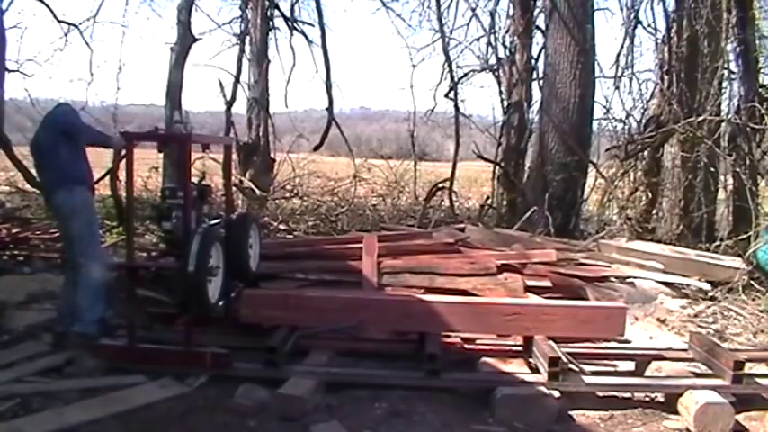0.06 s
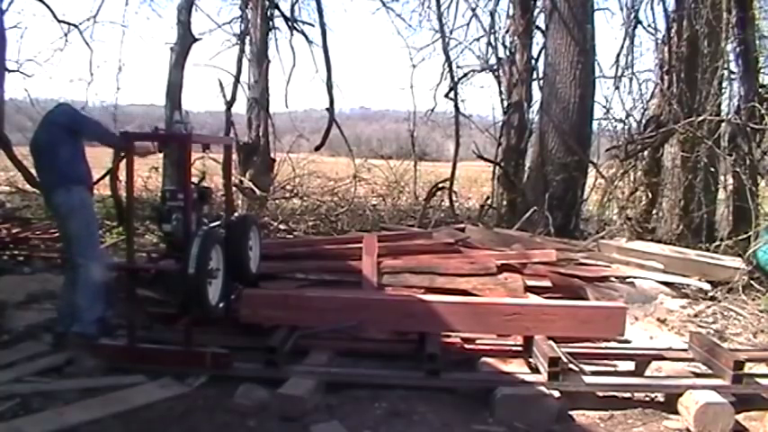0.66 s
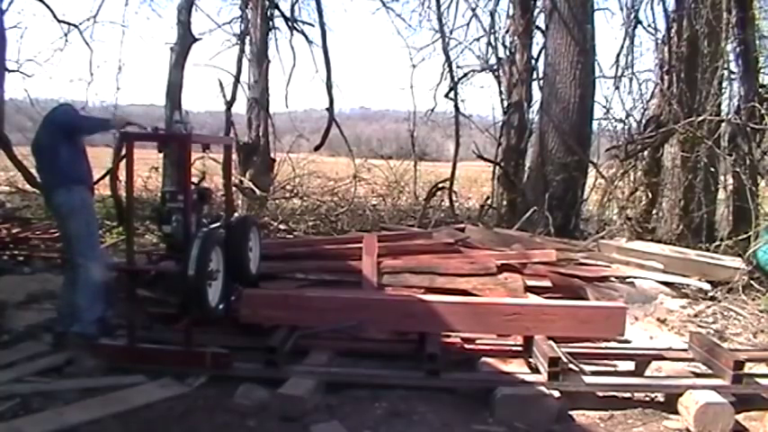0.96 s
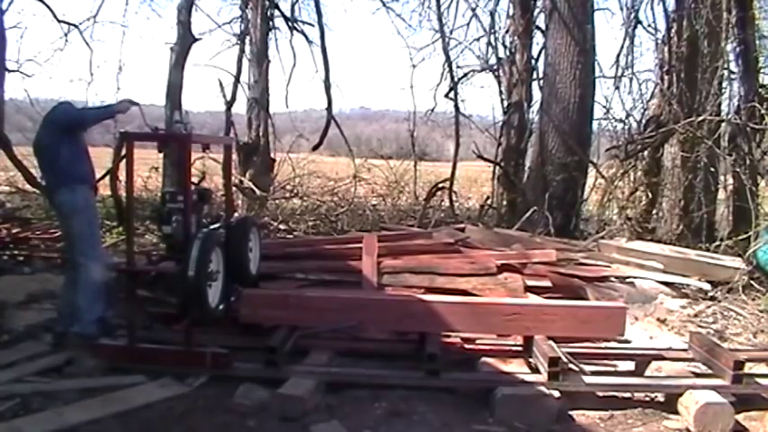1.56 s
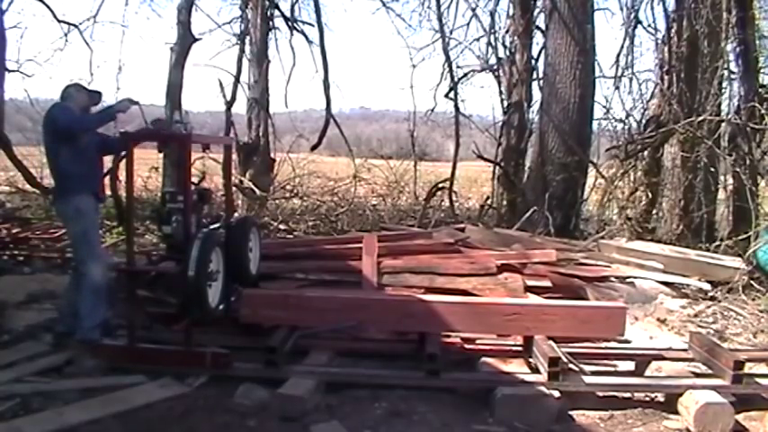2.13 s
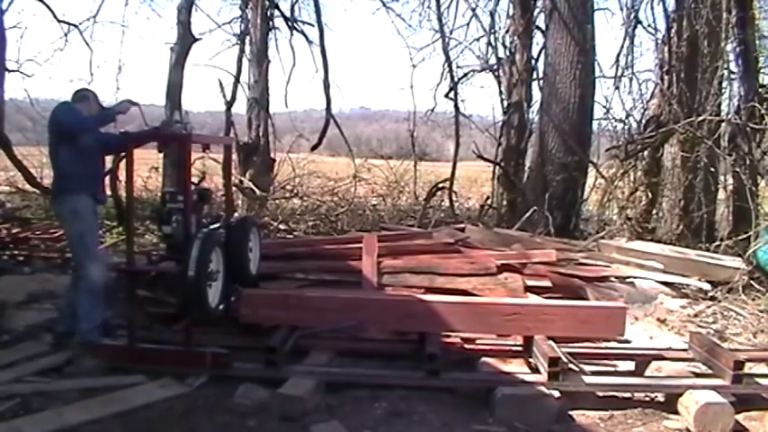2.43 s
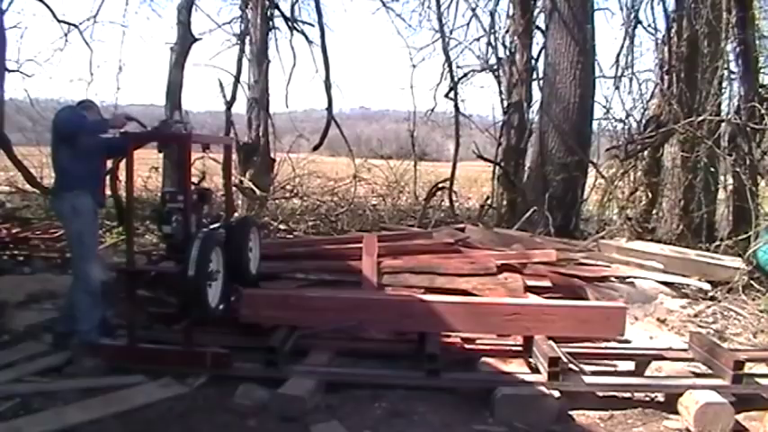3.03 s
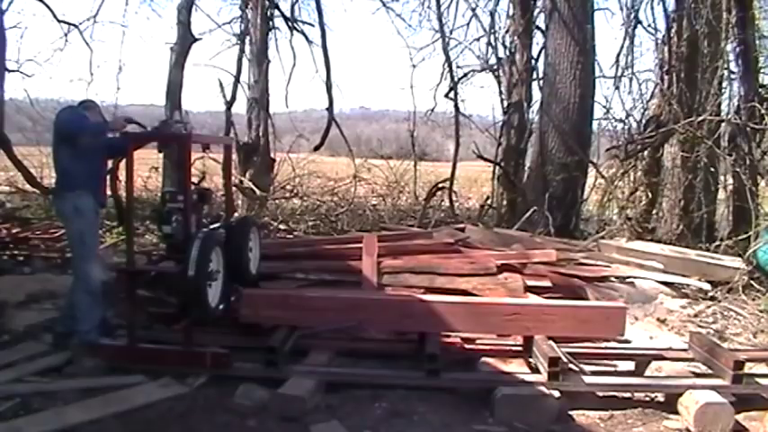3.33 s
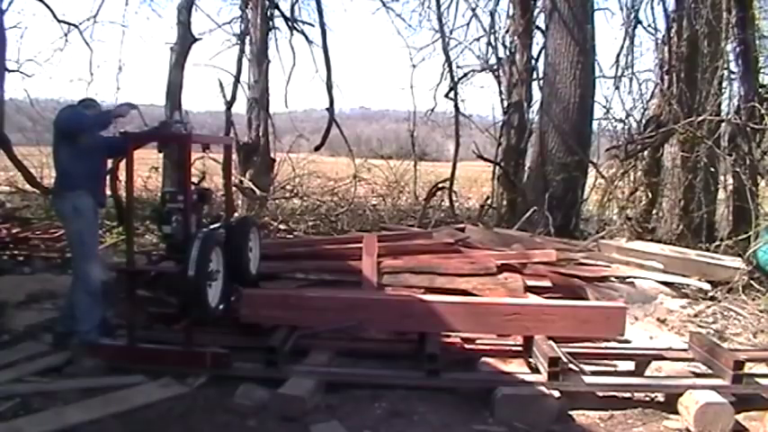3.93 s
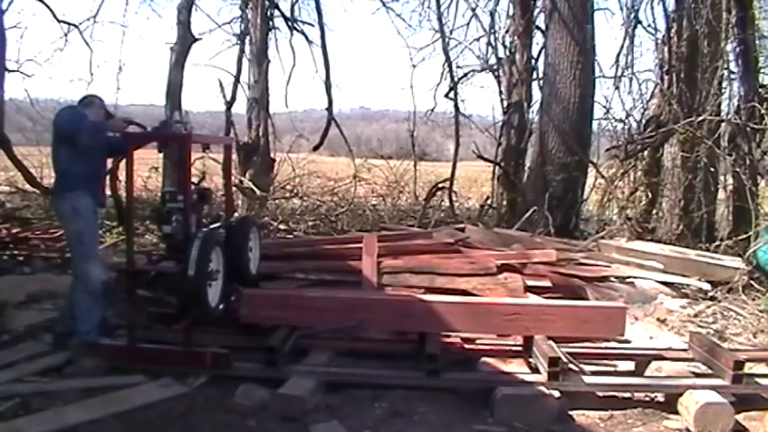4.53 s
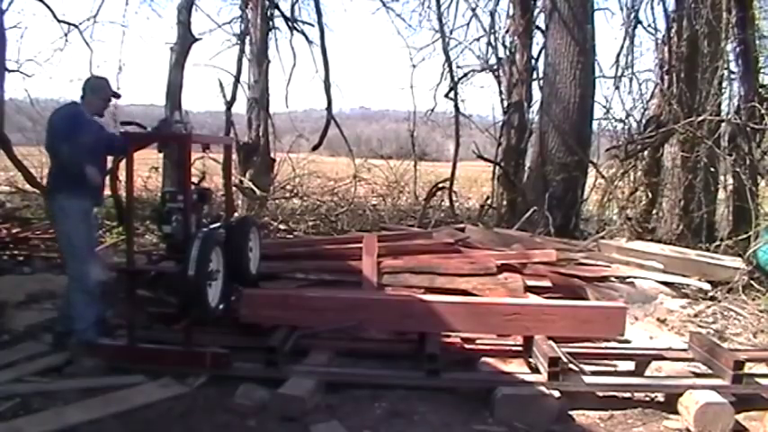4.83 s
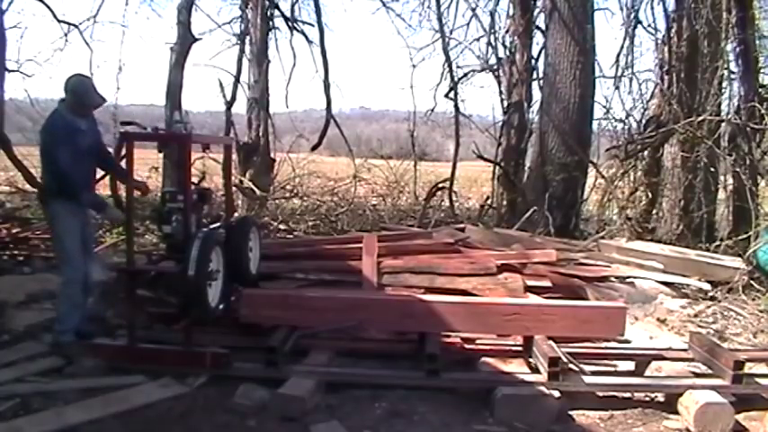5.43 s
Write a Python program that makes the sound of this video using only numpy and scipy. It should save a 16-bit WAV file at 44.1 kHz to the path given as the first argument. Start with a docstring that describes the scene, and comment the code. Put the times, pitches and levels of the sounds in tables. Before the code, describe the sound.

A sawmill crank ratchets quickly as its carriage rumbles to a stop, then steel levers clank and ring outdoors.

```python
"""A pawl clacks over the ratchet of a small sawmill's height crank, faster, then slower.
The carriage rumbles on its track and stops; steel levers squeak and clank against the ringing frame.
Under it: open air, a far traffic drone, a faint camera whine.
The camera's gain control ducks at loud clacks; the background swells back after each."""
import sys
import numpy as np
from scipy import signal
from scipy.fft import rfft, irfft, next_fast_len
from scipy.io import wavfile
from scipy.ndimage import uniform_filter1d, minimum_filter1d, map_coordinates

SR = 44100
rng = np.random.default_rng(int(sys.argv[2]) if len(sys.argv) > 2 else 0)


def unload_audio(sound):
    """Save the sound as a 16-bit wav file, at the path given as the first command line argument."""
    columns = np.transpose(np.atleast_2d(sound))
    # keep every value between -1 and 1, then stretch to whole-number steps
    steps = np.round(np.clip(columns, -1, 1) * 32767)
    wavfile.write(sys.argv[1], SR, steps.astype(np.int16))


N = 250488
T = np.arange(int(.7 * SR)) / SR  # time axis of one hit, s
TOP_HZ = 15500

# pawl drops, one per tooth [t/s, knock re mid band/dB]
PAWL_DROPS = [(0.0561, -13), (0.1489, -20), (0.2645, -16.5), (0.3962, -11), (0.5042, -10), (0.5897, -14),
              (0.6578, -14), (0.713, -12.5), (0.7686, -12), (0.829, -14.5), (0.8968, -12.5), (0.973, -17),
              (1.057, -16.5), (1.176, -14.5)]
# levers and catches on the frame [t/s, relative level/dB, treble/dB, treble knee f/Hz]
LEVER_HITS = [(2.333, -43, -20, 4190), (2.62, -10, -3, 4500), (2.673, -12.5, -1.5, 4480),
              (3.799, -41, -21, 4500), (3.8108, -26, -14.5, 4300), (4.306, -23.5, -13, 3740),
              (4.3103, -9.5, -8.5, 3780), (4.531, -40.5, -7, 4860), (4.538, -28, -25, 4830),
              (4.7081, -41, -24, 3750), (5.2986, -30.5, -20, 2880)]
# bars left free to ring by their catch [t/s, f/Hz, level/dB, t60/s]
BAR_RINGS = [(2.621, 1130, -34, 0.69), (2.673, 3150, -37, 0.59), (4.311, 3150, -30.5, 0.59),
             (4.539, 3150, -48, 0.71), (5.156, 2280, -41.5, 0.17), (5.156, 2500, -50, 0.2)]
# loose fittings [t/s, relative level/dB, treble/dB]
FITTING_TICKS = [(2.5367, -50.5, -10), (3.326, -54.5, -34), (3.8827, -53.5, 5), (4.684, -47, -21),
                 (5.114, -53, -8), (5.163, -50.5, -7), (5.4323, -53.5, -7.5)]
# dry pivots [centre t/s, length/s, f/Hz, level/dB, waver/share of f]
PIVOT_SQUEAKS = [(0.674, 0.045, 372, -41, 0.12), (.91, 0.098, 526, -44, 0.035),
                 (3.695, 0.064, 1907, -47.5, 0.0084)]
# squeak overtones [ratio to pitch, relative level/dB]
PIVOT_OVERTONES = [(1.67, 4), (2.25, 1.5), (3.1, 3.5), (5.32, -2.5), (6.55, 1.5)]
# dull bumps; at 2.62 s, a low thud under the loud clank [t/s, relative level/dB, hollow f/Hz]
DULL_BUMPS = [(1.637, -38.5, 399), (1.682, -37.5, 940), (1.754, -35, 440), (1.796, -43, 467),
              (2.621, -26.5, 140), (5.297, -31, 775), (5.438, -44.5, 720)]
# steel frame modes [f/Hz, relative level/dB, t60/s]
FRAME_MODES = [(1040, -23.5, 0.25), (1162, -10, 0.27), (1334, -5.5, 0.15), (1520, -12, 0.27),
               (2280, -7, 0.14), (2382, -15.5, 0.139), (3046, -9.5, 0.29), (3127, -9, 0.31),
               (3210, -10.5, 0.14), (3626, -16.5, 0.18), (3930, -14.5, 0.1), (4070, -14, 0.18),
               (4300, -10, 0.12), (4620, -11, 0.27), (5117, -16, 0.21), (6520, -6, 0.28), (6530, -11, 0.32),
               (7980, 0.5, 0.16), (8800, -5, .16), (8620, -4, 0.22), (9350, -12.5, 0.16), (9600, -4, 0.13),
               (11100, -8, 0.088), (13000, -2.5, .12)]

# envelopes [t/s, level/dB]
ROLL_LEVEL = [(0, -42.5), (.6, -38.5), (1.2, -44.5), (1.7, -48), (2, -52), (3, -62.5)]  # rolling carriage
TRAFFIC_LEVEL = [(0, -59), (1.6, -55.5), (3, -57.5), (5.68, -61.5)]  # far traffic, passing and receding
RUMBLE_LEVEL = [(0, -74.5), (2.5, -76.5), (5.3, -83), (5.6, -60)]  # its lowest band

# spectra [f/Hz, relative level/dB]
PAWL_SPECTRUM = [(150, -19.5), (500, -19), (1300, -1.5), (2300, -7.5), (2750, -11), (3300, -6.5),
                 (5200, -6.5), (5850, -7.5), (6450, 4), (7250, -2), (8600, 6), (10800, 0.5), (13600, -1.5),
                 (15200, -8)]  # dense ring of the pawl
LEVER_SPECTRUM = [(150, -17.5), (500, -18.5), (1100, -10.5), (2100, -1), (2600, -6.5), (3200, 1.5),
                  (4400, -3.5), (5100, 0.5), (5800, -1.5), (6500, 4.5), (7300, -4), (9500, 0.5),
                  (12000, -4), (15200, -13)]  # dense ring of levers and fittings
TRACK_SPECTRUM = [(100, -22), (250, -9), (450, -0.5), (850, 3.5), (950, 5.5), (1005, 11), (1070, -2),
                  (1160, 3.5), (1450, 0), (2000, -12), (4000, -28.5), (9000, -38.5)]  # track under the wheels
BUMP_SPECTRUM = [(60, -19.5), (200, -5), (330, -4.5), (600, 0.5), (850, 2), (1100, -10.5), (2000, -19),
                 (5000, -58)]  # dull bumps
AIR_SPECTRUM = [(120, -30.5), (200, -7), (321, -8.5), (345, -7), (497, -7.5), (783, -1.5), (858, -5.5),
                (1130, -9.5), (1450, -12), (1680, -15), (2700, -26), (3120, -27.5), (7090, -37),
                (11400, -37.5), (15500, -46)]  # open air
TRAFFIC_SPECTRUM = [(30, -24.5), (60, -14), (75, -3.5), (105, -2), (130, 0.5), (160, 2.5), (210, -10),
                    (350, -19), (1000, -55)]  # far traffic
RUMBLE_SPECTRUM = [(30, -30.5), (55, -4.5), (76, 6.5), (100, -7.5), (160, -38.5)]  # its lowest band
BREEZE_SPECTRUM = [(20, 5), (60, -2), (200, -4), (400, -9), (1500, -63)]  # wind on the microphone ports
THUD_SPECTRUM = [(8, -31.5), (35, -6), (120, 2.5), (300, 3.5), (700, -2.5), (2000, -25.5), (5000, -60)]  # microphone overload

# decay times [f/Hz, t60/s]
STEEL_T60 = [(200, 0.056), (1000, 0.26), (3000, 0.2), (8000, 0.12), (14000, 0.099)]  # dense ring
TREE_T60 = [(200, 0.36), (1500, 0.55), (4000, 0.37), (8000, 0.24), (14000, 0.23)]  # scatter from trunks and timber

# left-right correlation [f/Hz, coefficient]
STEEL_CORR = [(300, .8), (1400, 0.78), (3500, 1), (9000, 1), (11700, 0.89), (14500, 0.474)]
AIR_CORR = [(60, -.3), (130, 1), (290, 0.11), (640, 0.9), (1410, 0.72), (3100, 0.77), (6820, 0.312),
            (15000, 0.5)]
# microphone port imbalance [f/Hz, left minus right level/dB]
PORT_BALANCE = [(200, -1), (1400, -0.5), (4000, 0.5), (8500, 0.5), (11500, 1.5), (14500, 7.5)]


def ratchet(level_db=-13, slide_db=-21, shared=.55, usual_gap_s=0.086):
    """A sprung pawl slides off each tooth onto one spot: equal force, partly the same ring."""
    out = np.zeros((2, N))
    wheel = noise_pair(STEEL_CORR, len(T))
    teeth = np.array([(-0.02, PAWL_DROPS[0][1]), *PAWL_DROPS])  # crank already turning
    gaps_s = np.diff(teeth[:, 0], prepend=teeth[0, 0] - usual_gap_s)
    for (t_s, knock_db), gap_s in zip(teeth, gaps_s):
        treble_db = -2.5 + np.log2(gap_s / usual_gap_s)  # quick teeth are duller
        grain = np.sqrt(shared) * wheel + np.sqrt(1 - shared) * noise_pair(STEEL_CORR, len(T))
        clack = blow(grain, PAWL_SPECTRUM, ring_db=-13, crack_db=6, crack_t60_s=0.0056,
                     trees_db=-13, contact_db=3)
        add(out, t_s, amp(level_db) * hardness(clack, knock_db, treble_db, knee_hz=4350))
        add(out, t_s - len(T) / SR, amp(level_db + slide_db) * scrape(PAWL_SPECTRUM, t60_s=0.0069))
    return out


def blow(grain, spectrum, ring_db, crack_db, crack_t60_s, trees_db, contact_db):
    """Steel on steel: bright crack, short dense ring, scatter from trees, frame modes."""
    crack = amp(crack_db) * fade(crack_t60_s) * coloured(grain, [(2500, 1), (8000, -4)])
    diffuse = noise_pair([(300, 0.41), (1400, 0.99), (3500, 0.89), (9000, 1), (14500, .3)], len(T))
    scatter = amp(trees_db) * damped(diffuse, TREE_T60) * (1 - fade(.08))
    dense = coloured((crack + damped(grain, STEEL_T60) + scatter) * (1 - fade(0.0035)), spectrum)
    struck = unit_attack(coloured(dense, contact_point(contact_db)))
    return struck + amp(ring_db) * frame_ring() * (1 - fade(.003))


def contact_point(spread_db, points=120):
    """Each contact point favours other resonances: a random spectrum [f/Hz, level/dB]."""
    return np.transpose([np.linspace(0, TOP_HZ, points), spread_db * rng.standard_normal(points)])


def frame_ring(spread_db=0.5, beat_hz=45, beat_depth=0.99):
    """Frame modes waver like close, beating clusters; strengths vary per blow."""
    hz, db, t60_s = np.transpose(FRAME_MODES)
    gains = amp(db + spread_db * rng.standard_normal(len(hz)))
    drift = np.array([wobble(beat_hz, len(T)) for _ in hz])
    phase = rng.uniform(0, 2 * np.pi, (len(hz), 1)) + beat_depth * drift
    beats = 1 + beat_depth * np.roll(drift, 1, axis=0) / 2
    return gains @ (np.sin(2 * np.pi * hz[:, None] * T + phase) * beats * fade(t60_s[:, None]))


def hardness(hit, knock_db, treble_db, knee_hz):
    """Hard contacts are brighter: set knock and treble against the mid band."""
    hz = np.fft.rfftfreq(len(T), 1 / SR)
    power = np.mean(abs(rfft(hit)) ** 2, axis=0)
    bands_hz = [(500, 1800), (1800, 7000), (7000, 15000)]
    low_db, mid_db, high_db = [10 * np.log10(power[(hz > a) & (hz < b)].sum()) for a, b in bands_hz]
    shelves = [(1300, knock_db - low_db + mid_db), (2200, 0),
               (knee_hz, 0), (1.63 * knee_hz, treble_db - high_db + mid_db)]
    return coloured(hit, shelves) * np.sqrt(power.sum()) / amp(mid_db)


def scrape(spectrum, t60_s):
    """Steel slides over an edge: a brief swell that ends at the blow."""
    friction = coloured(noise_pair(STEEL_CORR, len(T)), spectrum)
    return unit_attack(friction * fade(t60_s))[:, ::-1]


def levers(level_db=-3, slide_db=-20):
    """Catches scrape home and strike the frame, each at another spot."""
    out = np.zeros((2, N))
    for t_s, db, treble_db, knee_hz in LEVER_HITS:
        knock_db = -12.5 - 0.29 * treble_db  # softer contact: less treble, more knock
        clank = blow(noise_pair(STEEL_CORR, len(T)), LEVER_SPECTRUM, ring_db=-13, crack_db=12.5,
                     crack_t60_s=0.0061, trees_db=-12, contact_db=3.5)
        slide = scrape(LEVER_SPECTRUM, t60_s=0.005)
        add(out, t_s, amp(db + level_db) * hardness(clank, knock_db, treble_db, knee_hz))
        add(out, t_s - len(T) / SR, amp(db + slide_db) * hardness(slide, knock_db, treble_db, knee_hz))
    return out


def free_bars(waver_rad=.3):
    """A bar freed by its catch sings on after the blow."""
    out = np.zeros((2, N))
    for t_s, hz, db, t60_s in BAR_RINGS:
        tone = np.sin(2 * np.pi * hz * T + waver_rad * wobble(28, len(T)))
        add(out, t_s, amp(db) * tone * fade(t60_s) * (1 - fade(0.017)))
    return out


def fittings(level_db=-6):
    """Loose parts tick, too lightly to ring the frame much."""
    out = np.zeros((2, N))
    for t_s, db, treble_db in FITTING_TICKS:
        tick = blow(noise_pair(STEEL_CORR, len(T)), LEVER_SPECTRUM, ring_db=-14.5, crack_db=-0.5,
                    crack_t60_s=.03, trees_db=-10.5, contact_db=1.5)
        add(out, t_s, amp(db + level_db) * hardness(tick, 3, treble_db, knee_hz=4120))
    return out


def pivots(overtones_db=-26, flicker_hz=300):
    """Dry pivots stick and slip: wavering pitch, flickering overtones."""
    out = np.zeros((2, N))
    for t_s, length_s, hz, db, waver in PIVOT_SQUEAKS:
        phase = 2 * np.pi * np.cumsum(hz * (1 + waver * wobble(flicker_hz, len(T)))) / SR
        overtones = sum(amp(level_db) * np.sin(ratio * phase) * wobble(flicker_hz, len(T))
                        for ratio, level_db in PIVOT_OVERTONES)
        tone = unit(np.sin(phase) + amp(overtones_db) * overtones)
        swell = np.exp(-(2 * (T - T.mean()) / length_s) ** 2)
        add(out, t_s - T.mean(), amp(db) * tone * swell)
    return out


def carriage(grit_db=1.1, rail_hz=1005, rail_db=-10, stop_s=1.84, stopping_s=0.053):
    """Wheels grind over grit and excite the track; the rail sings until they slow."""
    t = np.arange(N) / SR
    grind = unit(coloured(noise_pair(STEEL_CORR, N) * amp(grit_db * wobble(70)), TRACK_SPECTRUM))
    rail = unit(np.sin(2 * np.pi * rail_hz * t + wobble(35)) * (1 + wobble(25) / 2))
    at_speed = (1 - np.tanh((t - stop_s) / stopping_s)) / 2
    return amp(curve(ROLL_LEVEL)) * (grind + amp(rail_db) * at_speed * rail)


def dull_bumps(t60_s=0.12, level_db=-5, hollow_db=9, relative_width=0.075, jolt_hz=490):
    """Dull bumps, plus a jolt under each clank: short noise bursts with one hollow resonance."""
    out = np.zeros((2, N))
    jolts = [(t_s, -27.5 + 0.65 * db, jolt_hz) for t_s, db, *_ in LEVER_HITS]
    for t_s, db, hollow_hz in [*DULL_BUMPS, *jolts]:
        def gain(hz):
            detuning = (hz / hollow_hz - 1) / relative_width
            return amp(along(BUMP_SPECTRUM, hz) + hollow_db / (1 + detuning ** 2))
        burst = noise_pair([(200, .4), (800, 0.9)], len(T)) * fade(t60_s)
        add(out, t_s, amp(db + level_db) * unit_attack(filtered(burst, gain), samples=800))
    return out


def open_air(level_db=-52.5):
    """Broad, nearly steady outdoor hush."""
    return amp(level_db + 0.17 * wobble(1)) * steady_noise(AIR_SPECTRUM, AIR_CORR)


def traffic():
    """Far traffic drones past; its deepest rumble swells at its own pace."""
    drone_gain = amp(curve(TRAFFIC_LEVEL) + 0.89 * wobble(10))
    drone = steady_noise(TRAFFIC_SPECTRUM, [(60, -0.25), (160, 0.56)])
    rumble_gain = amp(curve(RUMBLE_LEVEL) + 0.5 * wobble(4.7))
    rumble = steady_noise(RUMBLE_SPECTRUM, [(50, -.5), (120, -0.06)])
    return drone_gain * drone + rumble_gain * rumble


def breeze(level_db=-70):
    """Light wind buffets the microphone ports."""
    return amp(level_db) * steady_noise(BREEZE_SPECTRUM, [(30, -0.78), (200, 0.041)])


def camera_whine(hz=11052, level_db=-83.5):
    """A faint high tone with wavering phase."""
    return amp(level_db) * unit(np.sin(2 * np.pi * hz * np.arange(N) / SR + wobble(39.75)))


def amp(db):
    """dB to gain."""
    return 10 ** (np.asarray(db) / 20)


def unit(x):
    """Scale to rms 1."""
    return x / np.sqrt(np.mean(x ** 2) + 1e-20)


def unit_attack(x, samples=400):
    """Scale a hit to rms 1 over its first samples."""
    return x / np.sqrt(np.mean(x[..., :samples] ** 2) + 1e-20)


def along(points, hz):
    """Interpolate [f/Hz, value] on a log axis."""
    knots_hz, values = np.transpose(points)
    return np.interp(np.log(hz + 1), np.log(knots_hz + 1), values)


def curve(rows):
    """Interpolate [t/s, value] per sample."""
    return np.interp(np.arange(N) / SR, *np.transpose(rows))


def wobble(rate_hz, samples=N):
    """Smooth random curve, rate_hz knots a second."""
    knots = rng.standard_normal(int(samples * rate_hz / SR) + 4)
    return map_coordinates(knots, [np.arange(samples) * rate_hz / SR])


def fade(t60_s):
    """Exponential decay over one hit."""
    return np.exp(-np.log(1000) * T / t60_s)


def add(track, t_s, sound):
    """Mix a sound in at t_s."""
    start = int(round(t_s * SR))
    part = sound[..., max(-start, 0):N - start]
    track[:, max(start, 0):max(start, 0) + part.shape[-1]] += part


def filtered(x, gain):
    """Minimum-phase filter with magnitude gain(hz)."""
    n = x.shape[-1]
    half = next_fast_len(n // 2 + 4096)
    magnitude = np.maximum(gain(np.fft.rfftfreq(2 * half, 1 / SR)), 1e-6)
    cepstrum = irfft(np.log(magnitude))
    cepstrum[1:half] *= 2
    cepstrum[half + 1:] = 0
    return irfft(rfft(x, 2 * half) * np.exp(rfft(cepstrum)))[..., :n]


def coloured(x, spectrum):
    """Filter by [f/Hz, level/dB]."""
    return filtered(x, lambda hz: amp(along(spectrum, hz)))


def noise_pair(correlation, samples):
    """White stereo noise with left-right correlation [f/Hz, coefficient]."""
    hz = np.fft.rfftfreq(samples, 1 / SR)
    angle = np.arccos(np.clip(along(correlation, hz), -.999, .999)) / 2
    white = rfft(rng.standard_normal((2, samples)))
    mid, side = irfft(white * [np.cos(angle), np.sin(angle)], samples)
    return np.array([mid + side, mid - side])


def steady_noise(spectrum, correlation):
    """Coloured stereo noise, N samples, rms 1."""
    return unit(coloured(noise_pair(correlation, N), spectrum))


def damped(x, decays):
    """Fade each frequency by [f/Hz, t60/s]."""
    hz, t, bins = signal.stft(x, SR, nperseg=256)
    decay = amp(-60 * t / along(decays, hz)[:, None])
    return signal.istft(bins * decay, SR, nperseg=256)[1][:, :x.shape[-1]]


def gain_control(x, threshold_db=-21.5, squeeze=0.78, hold_s=0.067, release_db_per_s=62):
    """Gain drops at once on loud treble, holds, then climbs back."""
    treble = np.diff(x.mean(axis=0), prepend=0)
    treble_db = 10 * np.log10(abs(uniform_filter1d(treble ** 2, 200)) + 1e-20)
    needed_db = -squeeze * np.maximum(treble_db - threshold_db, 0)
    needed_db[0] = -11  # starts low under the running ratchet
    half = int(hold_s * SR / 2)
    held_db = minimum_filter1d(needed_db, 2 * half + 1, origin=half)
    climb_db = release_db_per_s * np.arange(N) / SR
    gain_db = climb_db + np.minimum.accumulate(held_db - climb_db)
    return x * amp(uniform_filter1d(gain_db, 100))


def scene():
    """Mill and background at the two microphone ports."""
    mill = ratchet() + levers() + free_bars() + fittings() + pivots() + carriage() + dull_bumps()
    background = open_air() + traffic() + breeze() + camera_whine()
    lean = amp(along(PORT_BALANCE, np.fft.rfftfreq(2 * N, 1 / SR)) / 2)
    return irfft(rfft(mill + background, 2 * N) * [lean, 1 / lean])[:, :N]


def record(dry, left_thud_db=-8.0, right_thud_db=-4.5):
    """Gain control; steep treble overloads the input into a low antiphase thud; low-pass."""
    levelled = gain_control(dry)
    treble = np.diff(levelled.mean(axis=0), 2, prepend=[0, 0])
    thud = coloured(treble ** 2, THUD_SPECTRUM)
    heard = levelled + thud * np.array([[amp(left_thud_db)], [-amp(right_thud_db)]])
    low_pass = 1 / (1 + (np.fft.rfftfreq(2 * N, 1 / SR) / TOP_HZ) ** 120)
    return irfft(rfft(heard, 2 * N) * low_pass)[:, :N]


dry = scene()
out = record(dry)
unload_audio(out)
```